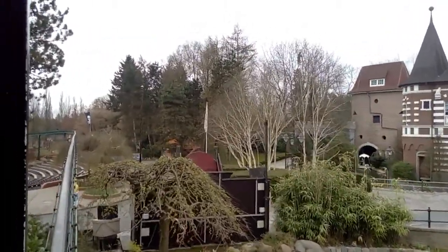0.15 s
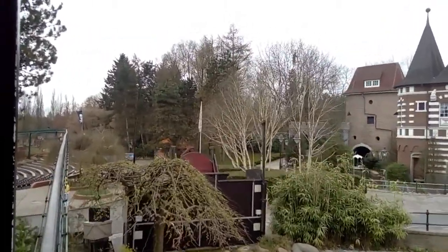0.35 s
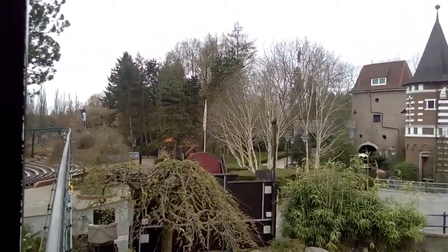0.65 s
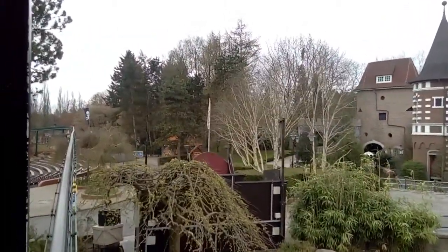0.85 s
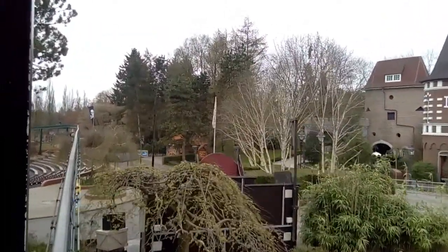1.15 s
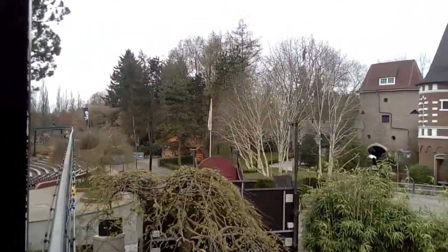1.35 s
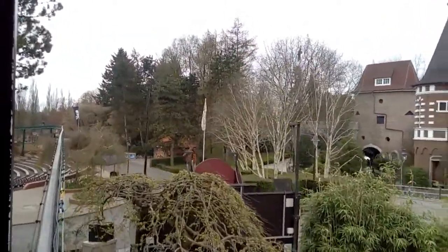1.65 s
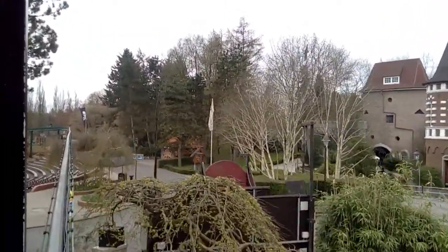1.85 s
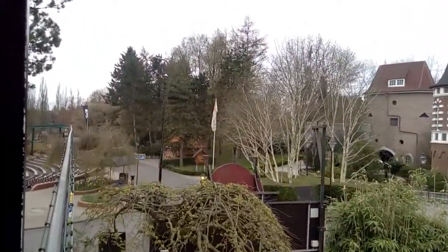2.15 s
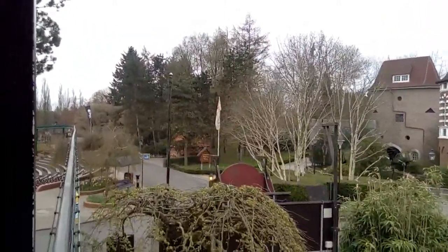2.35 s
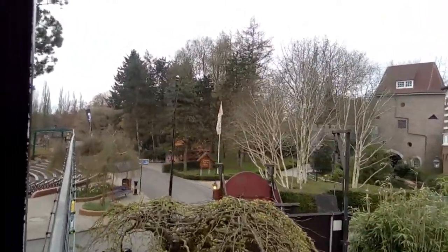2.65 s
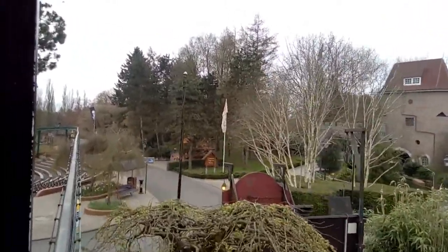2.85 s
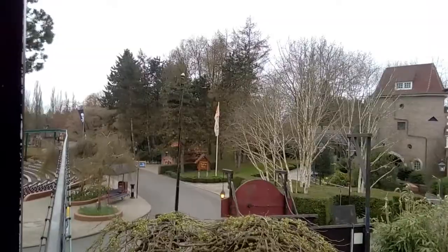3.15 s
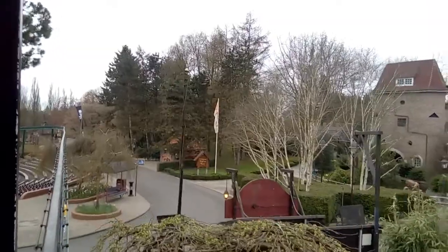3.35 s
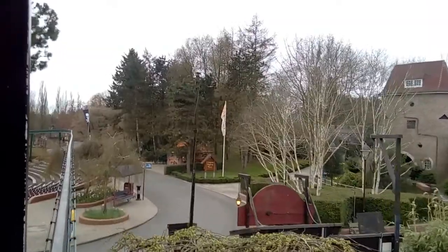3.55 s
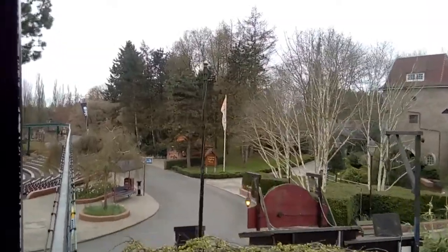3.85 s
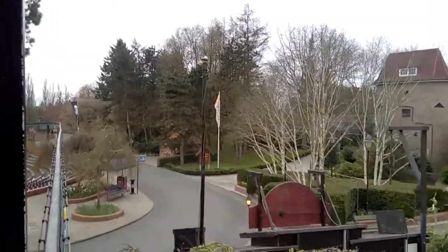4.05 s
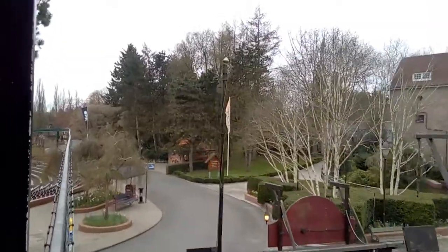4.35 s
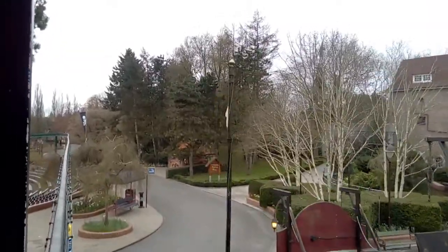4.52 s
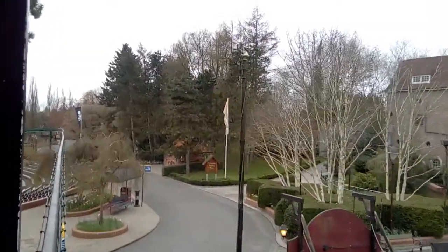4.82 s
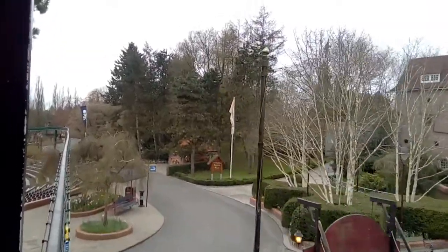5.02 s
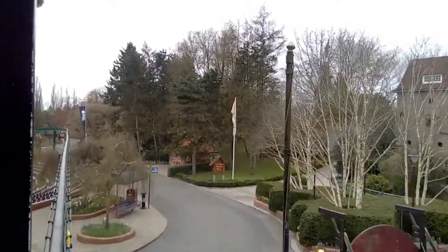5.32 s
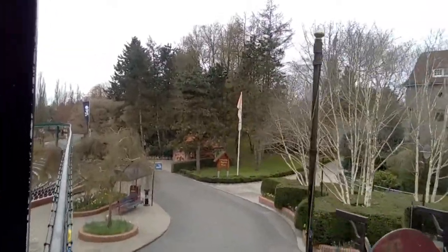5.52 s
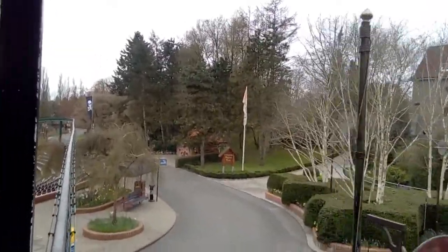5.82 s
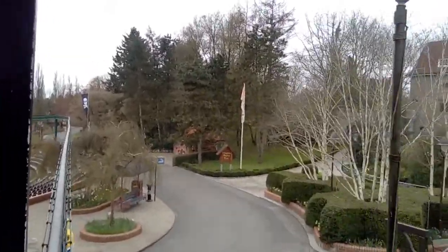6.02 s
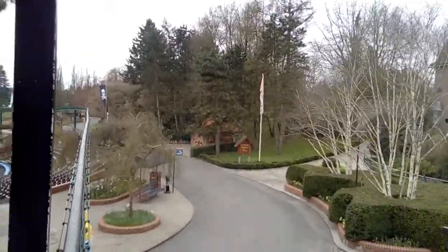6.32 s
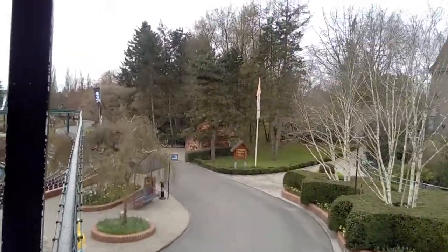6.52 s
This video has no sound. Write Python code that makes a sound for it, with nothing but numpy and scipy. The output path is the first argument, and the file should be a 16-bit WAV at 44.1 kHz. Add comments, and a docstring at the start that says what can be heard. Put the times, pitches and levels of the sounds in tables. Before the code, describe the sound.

An elevated rail car whines steadily around 1.5 kHz over rumbling wheels, with early wind buffeting, one later gust, loose metallic rattles and short squeaks.

```python
"""Wind thumps and crackles on the microphone over the whine of an open monorail car gliding on its beam.
The motor whines in near-sines on multiples of its shaft speed and swells with the load; the wheels rumble
and hiss in shaped noise. Loose fittings ring under showers of taps, rubbing parts squeak in short sinking
tones, and dry ticks are brief noise bursts. The gusts are flickering noise and single ringing pops."""
import sys
import numpy as np
from scipy import signal
from scipy.io import wavfile
from scipy.ndimage import uniform_filter1d

SR = 44100
rng = np.random.default_rng(int(sys.argv[2]) if len(sys.argv) > 2 else 0)


def digitize_waveform(pressure):
    """Quantize a signal to 16-bit integers and store it at the path in sys.argv[1].

    Rows of a 2-D input are taken as channels; values are limited to [-1, 1].
    """
    field = np.atleast_2d(pressure).T
    bounded = np.clip(field, -1, 1)
    quanta = np.round(bounded * 32767).astype(np.int16)
    wavfile.write(sys.argv[1], SR, quanta)


N = 294617


def amp(db):
    """Turn dB into a linear gain."""
    return 10 ** (np.asarray(db) / 20)


def rms_one(x):
    """Scale a signal to rms 1."""
    return x / np.sqrt(np.mean(x ** 2) + 1e-20)


def in_time(rows):
    """Draw each column of a breakpoint table as a curve, one value a sample."""
    times, *columns = np.transpose(rows)
    return [np.interp(np.arange(N) / SR, times, column) for column in columns]


def drift(rate_hz):
    """Random wander of rms 1: noise through two equal lowpass poles at rate_hz."""
    step = 20   # samples between drawn values; the rest is interpolated
    warm_up = 3000
    pole = np.exp(-2 * np.pi * rate_hz * step / SR)
    noise = rng.standard_normal(N // step + 2 + warm_up)
    slow = signal.lfilter([1], [1, -2 * pole, pole * pole], noise)[warm_up:]
    return np.interp(np.arange(N) / step, np.arange(len(slow)), rms_one(slow))


def coloured(spectrum, patchy_db, rate_hz, snaps_per_s=None):
    """Noise or sparse snaps in third-octave bands that flicker partly alone, partly together; rms 1."""
    hz, density_db = np.transpose(spectrum)
    edges = hz[0] * 2 ** np.arange(0, np.log2(hz[-1] / hz[0]), 1 / 3)
    out = 0
    together = drift(rate_hz)
    white = rng.standard_normal((2, N))   # neighbouring bands take different noises
    if snaps_per_s:
        white = white * (rng.random(N) < snaps_per_s / SR)
    for k, (low, high) in enumerate(zip(edges, edges[1:])):
        band_filter = signal.butter(2, [low, high], "band", fs=SR, output="sos")
        band = signal.sosfilt(band_filter, white[k % 2])
        level_db = np.interp(np.log(low * high) / 2, np.log(hz), density_db)
        flicker_db = patchy_db * (1.36 * together + 0.68 * drift(rate_hz))
        out = out + amp(level_db + flicker_db) * band
    return rms_one(out)


def ring(clicks, hz, t60_s):
    """Resonator: a unit click starts a sine of height 1 that falls 60 dB in t60_s."""
    radius = amp(-60 / (t60_s * SR))
    angle = 2 * np.pi * hz / SR
    feedback = [1, -2 * radius * np.cos(angle), radius * radius]
    return signal.lfilter([0, np.sin(angle)], feedback, clicks + 1e-18)   # offset avoids denormals


def swell(start, hold, rise_db_per_s, fall_db_per_s):
    """Gain that climbs to 1 at the start, holds, and sinks away, in straight dB slopes."""
    out = np.zeros(N)
    at = slice(max(0, int((start - .3) * SR)), min(N, int((start + hold + .4) * SR)))
    t = np.arange(at.start, at.stop) / SR - start
    slopes_db = np.minimum(rise_db_per_s * t, fall_db_per_s * (hold - t))
    out[at] = amp(np.minimum(0, slopes_db))
    return out


# gear whine, the 30th multiple of the shaft speed: (time [s], pitch [Hz])
WHINE_PITCH_CURVE = [(0, 1458), (2.0, 1462), (5.0, 1465), (6.0, 1469), (6.68, 1479)]
# tones that swell with the load: (shaft multiple, level against the whine [dB], share of the swell [0-1])
LOADED_TONES = [(28, -16.5, 1), (29, -2.5, 0.51), (30, 0.5, 0.97), (31, -16.5, 0.9), (34, -18.5, 0.8),
                (35, -27, 0.6)]
# tones that waver on their own: (shaft multiple, level [dB])
FREE_TONES = [(5, -51), (10, -60), (24, -69), (88, -75.5)]
# the teeth bite and the whine swells: (start [s], hold [s], whine level [dB])
WHINE_SURGES = [(0, 0.02, -39), (0.25, 0.18, -39.5), (0.51, 0.091, -44.5), (0.631, 0.14, -45.5),
                (0.94, 0.0086, -50), (1.107, 0.016, -43), (1.387, 0.087, -40.5), (1.697, 0.0098, -44),
                (1.873, 0.052, -47), (2.048, 0.081, -44.5), (2.296, 0.064, -47), (2.467, 0.18, -55),
                (2.813, 0.26, -42), (3.35, 0.026, -48.5), (3.629, 0.23, -40), (4.442, 0.075, -42),
                (4.628, 0.23, -41.5), (5.183, 0.11, -46), (5.46, 0.21, -46), (5.852, 0.16, -50),
                (6.098, 0.11, -45), (6.526, 0.12, -42)]
SURGE_RISE_DB_PER_S, SURGE_FALL_DB_PER_S = 304.5, 240
SLACK_DB = -57   # the whine between swells
LOAD_MEAN_DB = -49.5   # whine level from which the swell is counted


def motor():
    """Gear whine: near-sines locked to one shaft, their phase and level wavering a little."""
    shaft_phase = 2 * np.pi * np.cumsum(in_time(WHINE_PITCH_CURVE)[0]) / 30 / SR
    load = amp(SLACK_DB)
    for start, hold, db in WHINE_SURGES:
        load = load + amp(db) * swell(start, hold, SURGE_RISE_DB_PER_S, SURGE_FALL_DB_PER_S)
    swell_db = 20 * np.log10(load) - LOAD_MEAN_DB
    out = np.zeros(N)
    for multiple, db, share in LOADED_TONES:
        level_db = LOAD_MEAN_DB + db + share * swell_db + 1.4 * drift(23)
        out += amp(level_db) * np.sin(multiple * shaft_phase + 1.17 * drift(5.55))
    for multiple, db in FREE_TONES:
        level = amp(db + 4.5 * drift(8))
        phase_waver = (.8 + .014 * multiple) * drift(10)   # higher tones waver more
        out += level * np.sin(multiple * shaft_phase + phase_waver)
    return np.sqrt(2) * out   # table levels are rms


# how hard the wheels work: (time [s], rumble level [dB], hiss level [dB])
ROLLING_LEVELS = [(1.2, -45, -50.5), (1.5, -39.5, -51.5), (2.7, -40.5, -52), (3.2, -43, -54),
                  (4.7, -42.5, -51.5), (5.7, -44, -53.5), (5.95, -41.5, -48.5), (6.3, -47.5, -53.5),
                  (6.68, -43.5, -47.5)]
# colour of the wheel rumble: (frequency [Hz], density [dB per Hz])
RUMBLE_SPECTRUM = [(25, -39), (60, -14), (112, -0.5), (212, -2.5), (340, -6), (500, -12.5), (760, -14),
                   (1070, -23), (1500, -39.5)]
# colour of the wheel hiss: (frequency [Hz], density [dB per Hz])
HISS_SPECTRUM = [(900, -31.5), (1200, -11.5), (1450, -9), (1970, -14), (3020, -19), (3560, -23),
                 (5850, -27.5), (7500, -26)]
# booms of the car body: (frequency [Hz], width [Hz], level against the bare rumble [dB])
BODY_BOOMS = [(153.4, 16, -5), (298, 28, -6.5), (412, 22, -14.5)]


def rolling():
    """Wheels on the beam: noise rumble with resonant car-body booms, and a flickering hiss."""
    rumble_db, hiss_db = in_time(ROLLING_LEVELS)
    rumble = coloured(RUMBLE_SPECTRUM, patchy_db=1.0, rate_hz=8.8)
    for hz, width_hz, db in BODY_BOOMS:
        level = amp(db + 3.35 * drift(2.8))
        t60_s = np.log(1000) / np.pi / width_hz
        rumble += level * rms_one(ring(rng.standard_normal(N), hz, t60_s))
    rumble = amp(rumble_db + 1.5 * drift(25)) * rms_one(rumble)
    hiss = amp(hiss_db) * coloured(HISS_SPECTRUM, patchy_db=1.3, rate_hz=20)
    return rumble + hiss


# jolts: (time [s], shake of the middle fittings [dB], length [s], low fittings against middle [dB],
# high fittings against middle [dB], loosest fitting [Hz])
RATTLE_JOLTS = [(0.251, -25.5, 0.058, -26, -5.5, 3180), (0.334, -33, 0.04, -19, -1, 5800),
                (0.614, -29, 0.066, 2, -2.5, 2240), (0.716, -37.5, 0.21, -0.5, -9.5, 5400),
                (0.786, -36.5, 0.064, -5, -2.5, 4350), (1.072, -40, 0.15, 4, -4, 4300),
                (1.139, -30.5, 0.067, -10, -1.5, 2870), (1.15, -41, 0.11, -11, 5, 5460),
                (1.2, -33, 0.09, -7, 0, 2340), (1.314, -46, 0.037, -1, 2, 5750),
                (1.445, -32, 0.093, 5, -2.5, 1990), (1.569, -38.5, 0.14, 2, -7, 5800),
                (2.63, -44, 1, -7, -6, 2270), (3.3, -42.5, 0.13, 3, -5.5, 6130),
                (3.963, -31.5, 0.062, -4.5, -7.5, 1760), (3.729, -47, 0.082, -16, -1.5, 3130),
                (4.534, -43.5, 0.32, -29, -6.5, 5940), (4.672, -34, 0.05, 3, -3.5, 6800),
                (5.103, -33.5, 0.056, -7, -4.5, 4150), (5.275, -37.5, 0.067, -2, -6, 3080),
                (5.447, -30, 0.096, -7, -13, 4450), (5.584, -45, 0.066, 12, 1, 6030),
                (5.965, -30, 0.084, -19, -4.5, 3950), (6.147, -20.5, 0.018, -2, -6, 4300),
                (6.163, -24.5, 0.046, 8.5, -7, 2760)]
# what the fittings ring with: a row each for low, middle and high ones (resonances [Hz])
FITTING_MODES = [
    [580, 743, 840, 970, 1160],
    [1825, 1972, 2177, 2396, 2440, 2784, 2974, 3153],
    [3716, 3930, 4210, 4455, 4854, 4680, 5230, 5410, 5680, 5907],
]
FITTING_T60_S = .04
TAP_DB = -28.5   # tap gain, on top of the shake
JOLT_TAP = 1.1   # the first tap of a rattle, against the rms of the random ones
CHATTER_DB = -61.5   # resting shake: the fittings never rest while the car rolls
LOOSE_DB, LOOSE_OCTAVES = 11, .14   # boost at the loosest fitting, and how far it reaches


def rattles():
    """Each jolt starts a dying shower of uneven taps; fittings near the loosest one get the most boost."""
    out = np.zeros(N)
    jostle = drift(9)   # shared by all fittings
    jolts = [int(row[0] * SR) + 1 for row in RATTLE_JOLTS]
    tap_count = 900 * N // SR   # 900 taps a second
    for group, modes in enumerate(FITTING_MODES):
        for hz in modes:
            shake = amp(CHATTER_DB + 5.3 * drift(3.1) + 6.8 * jostle)
            for s, db, length, low_db, high_db, loose_hz in RATTLE_JOLTS:
                start = int(s * SR)
                size = min(int(3 * length * SR), N - start)
                t = np.arange(size) / SR / length   # in lengths of the rattle
                # jerks, shakes on, settles
                fade = (np.exp(-.45 * t) + 0.084 * np.exp(-12.0 * t)) / (1 + t ** 4)
                octaves_off = np.log2(hz / loose_hz)
                near_db = LOOSE_DB * np.exp(-(octaves_off / LOOSE_OCTAVES) ** 2)
                group_db = [low_db, 0, high_db][group]
                shake[start:][:size] += amp(db + group_db + near_db) * fade
            taps = np.zeros(N)
            taps[rng.integers(0, N, tap_count)] = rng.standard_normal(tap_count)
            taps[jolts] = JOLT_TAP * rng.choice([-1, 1], len(jolts))
            tap_gain = amp(TAP_DB + 2.0 * drift(5.2))
            out += ring(tap_gain * shake * taps, hz, FITTING_T60_S)
    return out


# rubbing parts: (time [s], length [s], start pitch [Hz], starting level of the tone [dB])
SQUEAK_CUES = [(0.157, 0.032, 5750, -45), (0.41, 0.099, 5720, -53), (0.532, 0.055, 5350, -49.5),
               (1.462, 0.037, 2310, -37), (2.655, 0.3, 3910, -59), (4.11, 0.1, 4360, -45),
               (5.258, 0.33, 2360, -45), (5.646, 0.11, 2200, -51), (5.802, 0.14, 2184, -45.5),
               (5.978, 0.44, 3220, -49), (6.2, 0.13, 4020, -56), (6.184, 0.12, 5350, -59),
               (6.361, 0.057, 5840, -52), (6.569, 0.12, 3160, -53.5)]
SQUEAK_BLUR = .6   # depth of the uneven slip; it also grows with the squeak's length
SQUEAK_SAG, SQUEAK_FADE_DB = 0.02, 5.5   # share of pitch and level lost over a squeak


def squeaks():
    """Rubbing parts sing: sinking, fading tones, blurred by uneven slip and rougher the longer they drag."""
    out = np.zeros(N)
    shiver, throb = drift(32), drift(30)
    slip = SQUEAK_BLUR * (drift(110) + 1j * drift(110))
    for s, length, hz, db in SQUEAK_CUES:
        at = slice(int(s * SR), min(int((s + length) * SR), N))
        size = at.stop - at.start
        along = np.arange(size) / size
        pitch_hz = hz * (1 - SQUEAK_SAG * along)
        phase = 2 * np.pi * np.cumsum(pitch_hz) / SR + (.6 + 3.0 * length) * shiver[at]
        level = amp(db - SQUEAK_FADE_DB * along + 2.2 * throb[at])
        window = signal.windows.tukey(size, min(1, 0.26 + 2.3 * length))
        blur = 1 + np.sqrt(length / 0.2) * slip[at]
        out[at] += level * window * np.imag(blur * np.exp(1j * phase))
    return out


# dry ticks: (time [s], nominal peak level [dB])
TICK_CUES = [(0.0737, -37), (0.1531, -27), (0.1795, -32), (0.3386, -32), (0.9408, -43), (3.9664, -29),
             (6.1474, -37)]


def ticks():
    """A tick is a bright burst of noise, gone in a few milliseconds."""
    out = np.zeros(N)
    t = np.arange(SR // 50) / SR
    bursts = rng.standard_normal((len(TICK_CUES), len(t)))
    for (s, db), noise in zip(TICK_CUES, bursts):
        # 7 dB down leaves room for the noise peaks
        out[int(s * SR):][:len(t)] += amp(db - 7) * np.exp(-t / .0015) * noise
    return signal.sosfilt(signal.butter(2, 1500, "high", fs=SR, output="sos"), out)


# gusts on the microphone, before the wind's treble cut:
# (start [s], hold [s], thud level [dB], flutter level against the thud [dB])
WIND_GUSTS = [(0, 0.01, -6.5, -10), (0.057, 0.039, -16.5, -3), (0.178, 0.03, -15, -6),
              (0.216, 0.067, -21.5, 5), (0.314, 0.022, -12, -2.5), (0.356, 0.046, -19.5, -1.5),
              (0.5, 0.08, -29.5, -7), (0.645, 0.083, -25, -6.5), (0.784, 0.085, -38, -22),
              (0.931, 0.073, -25, -9.5), (1.04, 0.099, -31.5, -18.5), (4.163, 0.061, -21, -44),
              (4.223, 0.098, -20.5, -16)]
# colour of the low thud: (frequency [Hz], density [dB per Hz])
THUD_SPECTRUM = [(20, -14), (40, -12), (140, 2), (233, -3.5), (338, -4), (500, -16.5), (800, -13.5)]
# colour of the upper flutter: (frequency [Hz], density [dB per Hz])
FLUTTER_SPECTRUM = [(380, 3.5), (620, -3.5), (900, -6), (1450, -19.5), (2200, -34), (3000, -55)]
GUST_RISE_DB_PER_S, GUST_FALL_DB_PER_S = 438.5, 286.5
WIND_TOP_HZ = 2050


def wind():
    """Eddies burst on the port: a lumpy low thud and a crackling flutter, jolted together, with pops."""
    thud_gain = flutter_gain = 0
    for start, hold, thud_db, flutter_db in WIND_GUSTS:
        gust = swell(start, hold, GUST_RISE_DB_PER_S, GUST_FALL_DB_PER_S)
        thud_gain = thud_gain + amp(thud_db) * gust
        # the power makes the flutter come later and go sooner
        flutter_gain = flutter_gain + amp(thud_db + flutter_db) * gust ** 2.44
    lumps = drift(100)
    thud_noise = coloured(THUD_SPECTRUM, patchy_db=1.2, rate_hz=40)
    thud = rms_one(amp(2.2 * lumps) * thud_noise)
    flutter_snaps = coloured(FLUTTER_SPECTRUM, patchy_db=1.5, rate_hz=60, snaps_per_s=700)
    flutter = rms_one(amp(2.5 * lumps) * flutter_snaps)
    gusts = thud_gain * thud + flutter_gain * flutter + pops()
    return signal.sosfilt(signal.butter(4, WIND_TOP_HZ, fs=SR, output="sos"), gusts)


# single eddies that pop on the port: (time [s], nominal peak level before filtering [dB], pitch [Hz])
WIND_POPS = [(.009, 7, 523), (.026, 1.5, 555), (0.046, 1.5, 426), (.07, 1.5, 236), (.147, -3, 380),
             (0.18, -3.5, 462), (0.21, -2.5, 169), (0.239, 1.5, 600), (0.264, -14, 500), (0.312, -21, 303),
             (0.337, 2, 260), (0.357, -5, 270), (0.503, -20, 870), (0.629, -13, 784), (0.646, -10, 197),
             (.67, -8.5, 430), (0.702, -11, 271), (0.927, -19, 820), (0.897, -24, 130), (0.941, -17.5, 910),
             (0.945, -6, 123), (0.982, -8.5, 153), (.995, -7, 108), (1.015, -12.5, 131),
             (1.051, -15.5, 373), (4.155, -12, 199), (4.177, -9, 140), (4.206, -5, 319), (4.218, 1, 296),
             (4.255, -9, 523), (4.262, -4.5, 187), (4.295, -7, 338), (4.317, -12.5, 153)]
POP_EDGE = 0.33   # brighter front of a pop, against its body


def pops():
    """A pop is a soft blow that swells and rings for a cycle or two."""
    out = np.zeros(N)
    t = np.arange(SR // 20) / SR
    signs = rng.choice([-1, 1], len(WIND_POPS))
    for (s, db, hz), sign in zip(WIND_POPS, signs):
        envelope = 1.01 * (1 - np.exp(-5.0 * hz * t)) ** 2 * np.exp(-.9 * hz * t)
        body = np.cos(2 * np.pi * hz * t)
        edge = POP_EDGE * np.exp(-hz * t) * np.cos(5 * np.pi * hz * t)
        out[int(s * SR):][:len(t)] += sign * amp(db) * envelope * (body + edge)
    return signal.sosfilt(signal.butter(2, 40, "high", fs=SR, output="sos"), out)


def scene():
    """Mix every source at one microphone."""
    return (motor() + rolling() + rattles() + squeaks() + ticks() + wind())[None]


MIC_BOTTOM_HZ, MIC_TOP_HZ, CUTOFF_HZ = 40, 6310, 15500
SELF_NOISE_DB = -84   # before the final top cut
STEEP_HISS_DB = 3.5   # extra faint hiss where the sound swings steeply, against the slope squared


def record(dry):
    """Roll off both ends as the microphone does, round the peaks, add faint hiss and cut the top."""
    dull = signal.sosfilt(signal.butter(10, MIC_TOP_HZ, fs=SR, output="sos"), dry)
    dull = signal.sosfilt(signal.butter(2, MIC_BOTTOM_HZ, "high", fs=SR, output="sos"), dull)
    slope_squared = uniform_filter1d(np.gradient(dull, axis=1) ** 2, size=150)
    hiss_gain = amp(SELF_NOISE_DB) + amp(STEEP_HISS_DB) * slope_squared
    hiss = hiss_gain * rng.standard_normal(dry.shape)
    rounded = dull / (1 + np.abs(dull) ** 6) ** (1 / 6)
    return signal.sosfilt(signal.cheby2(12, 70, CUTOFF_HZ, fs=SR, output="sos"), rounded + hiss)


dry = scene()
out = record(dry)
digitize_waveform(out)
```